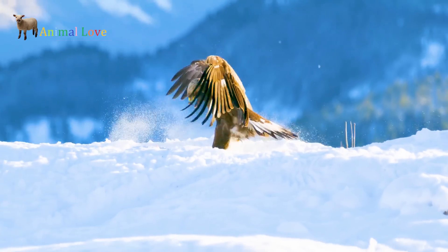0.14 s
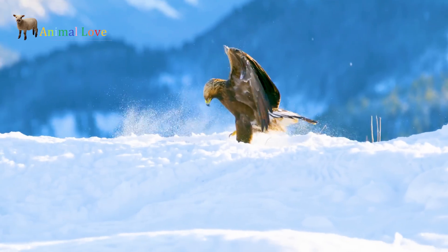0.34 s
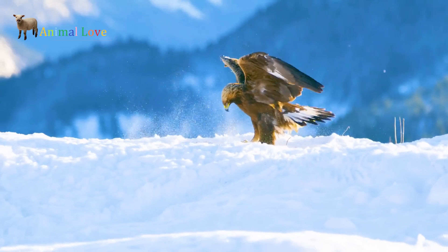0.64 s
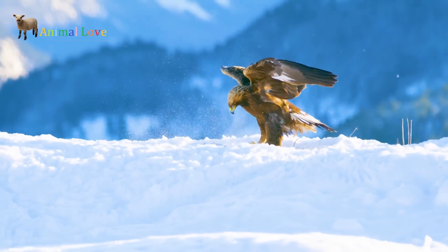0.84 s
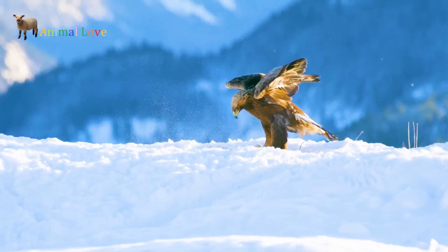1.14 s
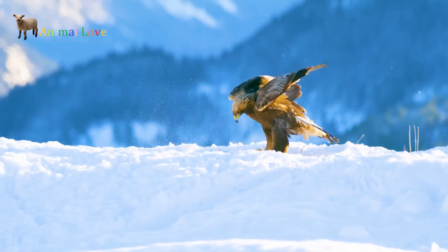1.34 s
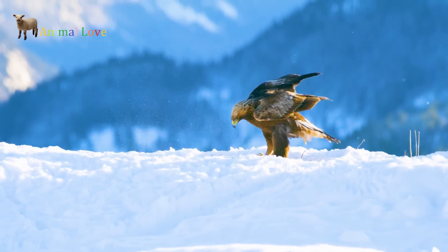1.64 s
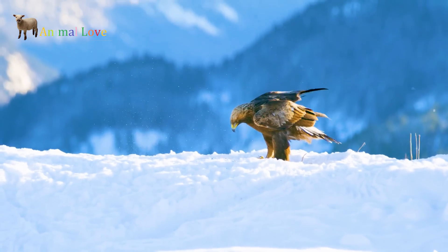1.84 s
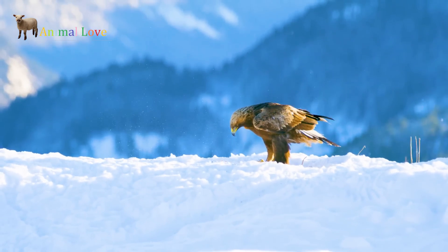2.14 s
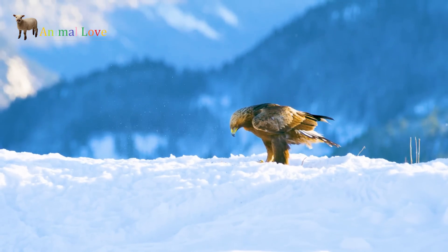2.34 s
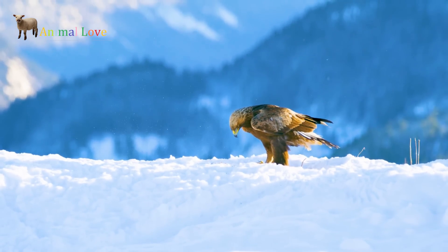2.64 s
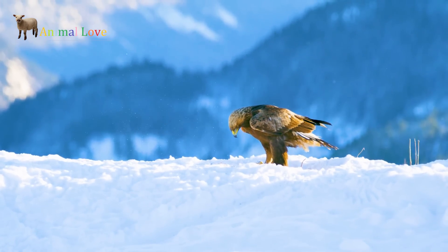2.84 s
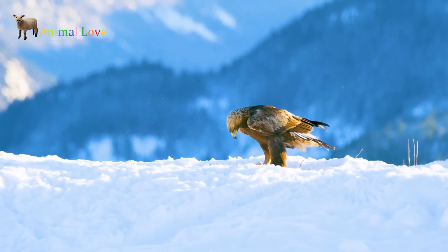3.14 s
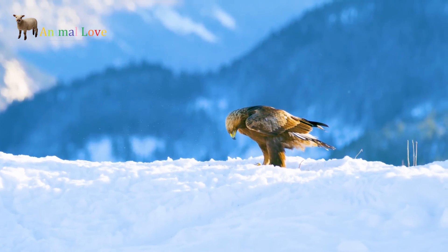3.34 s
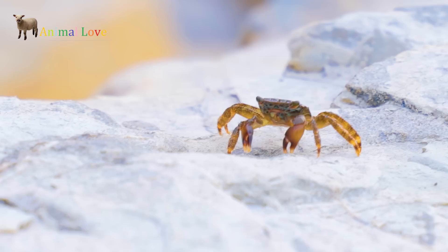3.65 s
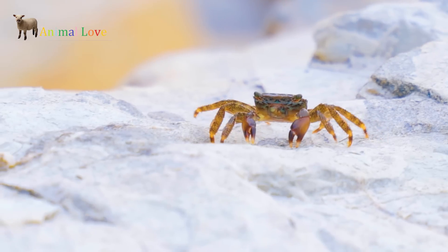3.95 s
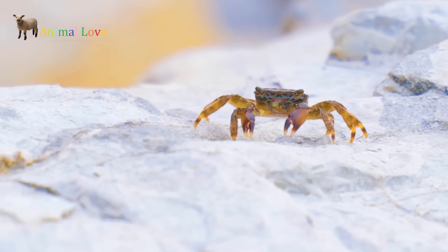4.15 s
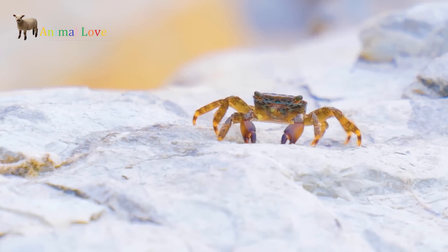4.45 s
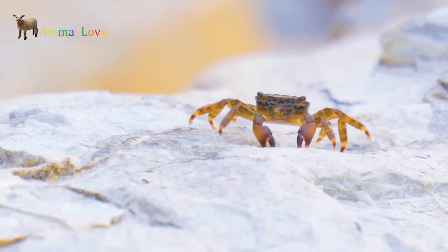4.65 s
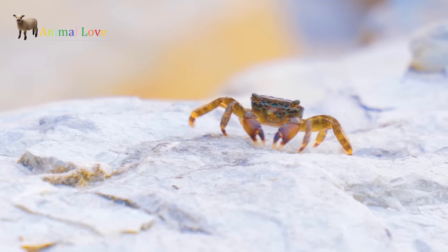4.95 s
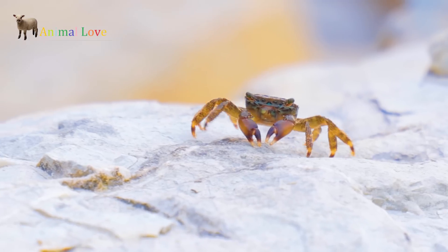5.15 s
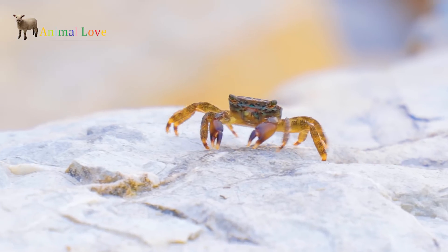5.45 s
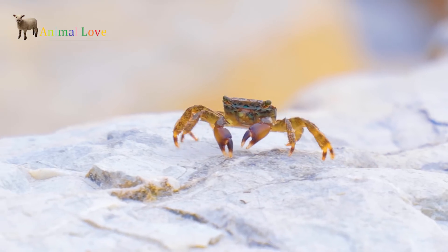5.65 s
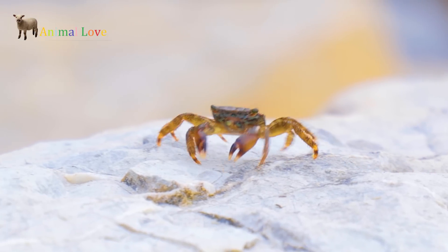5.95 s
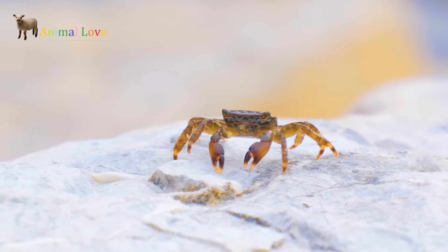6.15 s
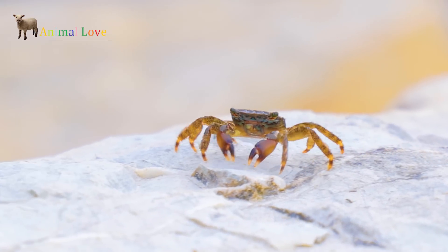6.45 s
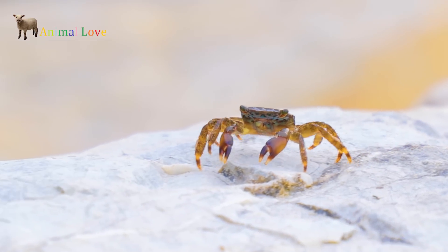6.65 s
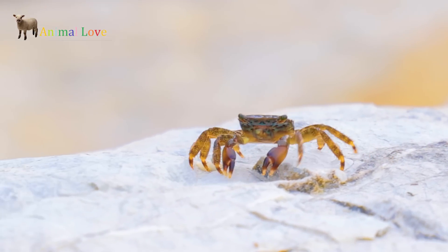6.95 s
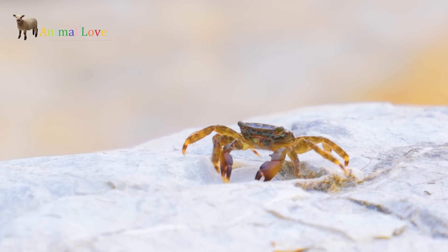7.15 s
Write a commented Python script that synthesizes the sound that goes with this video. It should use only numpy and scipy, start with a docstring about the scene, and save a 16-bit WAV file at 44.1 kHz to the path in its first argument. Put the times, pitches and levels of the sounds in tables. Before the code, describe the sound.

A bird of prey screams loudly and breaks into quavering yelps, songbird chips follow, then woodland air opens with cooing dove and fluting, buzzing thrush.

```python
"""A bird of prey gives one long rasping scream that breaks into a quaver: unsteady tones, sagging and then arching,
over resonant throat noise. Beside it, just right of centre, a small songbird chips, trills and scolds in quick sweeps.
From about 3.2 s a louder woodland air, shaped noise, opens: a dove coos on the left in sagging tones, and a thrush
on the right flutes, buzzes and twitters, with short sharp ticks ringing in strong echo at the centre and faint calls
deeper in the wood. Each bird has its own echo from the trees, scattered differently to the two stereo channels."""
import sys
import numpy as np
from scipy import signal
from scipy.fft import rfft, irfft
from scipy.io import wavfile
from scipy.ndimage import uniform_filter1d, map_coordinates

SR = 44100
rng = np.random.default_rng(int(sys.argv[2]) if len(sys.argv) > 2 else 0)


def digitize_waveform(pressure):
    """Quantize a signal to 16-bit integers and store it at the path in sys.argv[1].

    Rows of a 2-D input are taken as channels; values are limited to [-1, 1].
    """
    field = np.atleast_2d(pressure).T
    bounded = np.clip(field, -1, 1)
    quanta = np.round(bounded * 32767).astype(np.int16)
    wavfile.write(sys.argv[1], SR, quanta)


N = 322371
TIME = np.arange(N) / SR  # seconds
EDGE_S = .0038  # half the time in which a note opens or closes

# The bird of prey's held scream. Each row: time in seconds, pitch in Hz, level in dB.
SCREAM_CURVE = [(0.003, 2151, -12.5), (0.139, 2170, -14.5), (0.307, 2135, -16), (0.333, 2127, -21.5),
                (0.411, 2106, -13.5), (0.449, 2092, -21), (0.477, 2065, -18), (0.493, 2098, -22),
                (0.527, 2059, -17), (0.617, 2061, -17), (0.626, 2038, -20)]
# Its voice breaking downward. Each row: time in seconds, pitch in Hz, level in dB.
BREAK_CURVE = [(.627, 1616, -11), (.651, 1534, -11), (.675, 1727, -10.5), (.69, 1816, -21),
               (.704, 1577, -11), (.725, 1500, -13.5), (.744, 1628, -9.5), (.765, 1489, -13)]
# Scream and lower voice cutting briefly into each other. Each row: start in seconds, length in seconds,
# first, middle and last pitch in Hz, level in dB.
CATCHES = [(0.573, .04, 1631, 1633, 1590, -26), (0.675, .026, 2069, 2090, 2002, -18.5)]
# Arched yelps of the quaver, each led in by a low scoop. Each row: start in seconds, length in seconds,
# top pitch in Hz, level in dB, scoop length in seconds.
YELPS = [(.802, .028, 1632, -8.5, .035), (.861, 0.03, 1670, -7.5, .03), (.924, .028, 1685, -7, .03),
         (.989, 0.026, 1640, -8, .016), (1.057, .028, 1677, -10, .014), (1.134, .021, 1659, -9, .014)]
# Throat resonances of the rasp. Each row: centre in Hz, width in Hz, relative level in dB.
THROAT_RESONANCES = [(860, 370, -11), (1417, 170, -5), (1568, 170, 4.5), (2120, 260.6, -3),
                     (2570, 210, -14), (3650, 150, -21)]
# Strength of the rasp. Each row: time in seconds, level in dB.
RASP_CURVE = [(0, -24.5), (.28, -29.5), (.34, -32), (.4, -30), (.52, -38), (.6, -38), (.72, -38.5),
              (.8, -35.5), (1.08, -35), (1.161, -41.5)]

# Songbird chips: a quick lead-in, most often upward, then a fall, shaken in many of them. Each row: time of the
# turn in seconds, lead-in and fall in seconds, first, turning and last pitch in Hz,
# level at the beak's resonance in dB, shake rate in Hz, shake depth in Hz.
CHIPS = [(.088, 0.0081, 0.028, 8300, 8660, 4840, -25.5, 127, 400),
         (.159, 0.0039, 0.036, 8500, 8580, 4660, -26, 123.5, 350),
         (.449, 0.0063, 0.026, 4700, 7000, 5150, -28, 181, 699),
         (.552, 0.0062, 0.029, 5060, 7300, 5380, -27, 178, 681),
         (2.657, 0.012, 0.059, 4650, 8600, 3700, -29, 0.5, -0.5),
         (2.853, 0.013, 0.056, 3900, 8280, 3600, -25.5, 0, -1),
         (3.046, 0.0069, 0.01, 4880, 6220, 3340, -18.5, -1, -2),
         (3.192, 0.0061, 0.0099, 4840, 6160, 3360, -22, 0.5, 0),
         (3.297, 0.0032, .058, 7200, 6460, 4170, -22.5, 112, 746),
         (3.522, .002, 0.039, 8540, 8400, 4430, -22.5, 123.5, 380),
         (3.596, .002, .039, 8500, 8380, 4530, -26.5, 115, 550),
         (3.675, 0.0035, 0.037, 8550, 8250, 4400, -24.5, 114, 380)]
BEAK_HZ, BEAK_DB_PER_OCT2 = 5450, -44  # resonance of the beak; loss per squared octave away from it
# Songbird whistles. Each row: start in seconds, length in seconds, first, middle and last pitch in Hz,
# level in dB, loudest point as a share of the note, swell in dB, shake depth in Hz.
WHISTLES = [(0.248, 0.075, 3264, 3244, 3070, -31, 0.34, 10, 0),
            (0.401, 0.45, 2730, 2795, 2780, -42, 0.4, 8, 1),
            (.418, 0.029, 4480, 4750, 4740, -30, 1, 8, 1.5),
            (0.517, 0.031, 4700, 5030, 5000, -25, 0.55, 7, 0.5),
            (0.674, 0.072, 3470, 3675, 3670, -30, 0.1, 12.5, -0.5),
            (1.85, 0.03, 4300, 4535, 4510, -33.5, 0.55, 17, 0),
            (2.009, 0.041, 3220, 3515, 3566, -38.5, 0.7, 23, -0.5),
            (2.203, 0.074, 4600, 5840, 6150, -46.5, 0.1, 13.5, 49.5),
            (2.224, 0.077, 3450, 4070, 4120, -51, .3, 5, 0),
            (2.355, 0.11, 6340, 6340, 6250, -53.5, 0.2, 7, 0),
            (2.36, 0.093, 4140, 4360, 4610, -38.5, 1, 26, 1),
            (2.449, 0.1, 4614, 5580, 5930, -35, 0.25, 7.5, -0.5),
            (2.763, 0.034, 3134, 3540, 3570, -33, 0.62, 13, 0),
            (2.952, 0.055, 3530, 3780, 4290, -25.5, .68, 11, 169),
            (3.013, 0.0254, 4400, 4656, 4910, -23, 0.8, 1, 0.5),
            (3.11, 0.042, 3590, 3750, 4190, -26, 0.7, 9.5, 174),
            (3.156, 0.033, 4240, 4600, 4850, -25.5, 0.9, 5, 0),
            (3.258, 0.034, 5600, 6260, 8400, -29, .42, 10, 0.5),
            (3.353, 0.033, 3880, 3690, 3520, -24.5, 0.16, 8, 0),
            (3.397, 0.029, 3790, 4200, 4320, -33, .9, 6, 1),
            (3.429, 0.032, 4390, 4564, 4460, -21, 0.3, 10, 0)]
WHISTLE_SHAKE_HZ = 195.6
# Harsh scolding notes. Each row: start in seconds, length in seconds, pitch in Hz, level in dB,
# flap rate in Hz, flap depth in Hz, hiss in dB.
SCOLDS = [(1.606, .025, 3500, -26.5, 689, 700, -2), (3.469, 0.028, 3540, -28, 519, 700, -11)]
# What the wide-open beak lets through. Each row: frequency in Hz, gain in dB.
OPEN_BEAK = [(1500, -45), (2500, -29), (3050, 0), (4400, 0), (5600, -8), (6600, -21), (8000, -18),
             (9400, -38), (11000, -31), (15000, -39)]
BOUNCE_S, BOUNCE_DB = .0027, -10  # the songbird's reflection from the ground

# Thrush notes. Each row: start in seconds, length in seconds, first, middle and last pitch in Hz, level in dB,
# loudest point as a share of the note, swell in dB, shake depth in Hz, roughness as a share of the pitch.
SONG = [(4.348, 0.12, 2113, 2170, 1900, -24, 0.48, 7, -2, 0.01),
        (4.55, 0.11, 1581, 1669, 1860, -21.5, 0.86, 9.5, 0, 0.01),
        (4.661, .11, 1843, 1830, 1730, -19, 0.95, 11.5, 0, 0),
        (4.852, 0.042, 2140, 2134, 1824, -19, 0.92, 7, -2, 0.01),
        (4.889, 0.035, 2690, 2440, 2470, -30.5, 0.34, 11, -0.5, 0.03),
        (4.938, 0.078, 1997, 2107, 2240, -12, 0.3, 4, 0, .003),
        (5.118, .058, 2150, 2450, 2870, -13, 1, 18.5, 0, 0.05),
        (5.178, 0.0062, 2910, 2940, 2970, -7, .6, 2, 2, 0),
        (5.187, .014, 2940, 2900, 2720, -14, 0.62, 6, 0, 0.03),
        (5.306, 0.017, 4220, 4130, 4200, -24.5, .5, 1, -2, .03),
        (5.15, 0.042, 3400, 3670, 3840, -31.5, 0, 6, 0, 0.03),
        (5.716, 0.037, 4520, 4360, 4470, -18.5, .55, 5, 0.5, 0.03),
        (5.782, 0.077, 2018, 2094, 1990, -25.5, 0.47, 12.5, 0.5, 0.02),
        (5.81, 0.024, 3770, 3940, 4400, -20, 0.1, 5, 0, 0.04),
        (5.864, .042, 11300, 10850, 10700, -35, 0.5, 3, 451, 0.06),
        (5.883, 0.051, 3580, 3643, 3510, -11.5, 0.45, 13.5, 2, 0.01),
        (5.982, 0.16, 3356, 2967, 2938, -22.5, 0.8, 5, 0.5, 0.02),
        (6.003, 0.13, 3620, 4274, 3125, -11.5, 0.48, 14, 166, 0.01),
        (6.005, 0.12, 2150, 2070, 2020, -36.5, .5, 4, -2, 0.02),
        (6.178, 0.044, 3494, 4360, 5320, -10, 0.81, 13, 0.5, 0.04),
        (6.221, 0.033, 5380, 5470, 5300, -15, 0, 10, 0, 0.03),
        (6.315, .011, 4260, 4500, 4480, -14, .35, 6, -1, 0.02),
        (6.33, .048, 4750, 5236, 3960, -15, 0.35, 3, 250, 0.02),
        (6.378, 0.018, 4080, 3860, 3770, -22, .2, 2, 0, .02),
        (6.503, .026, 2850, 2890, 2890, -24, 0.66, 15, 2, 0.01),
        (6.555, .07, 3190, 3170, 3150, -34, 0, 10, 0, 0.03),
        (6.532, 0.024, 2220, 2325, 2290, -31, .25, 6, -2, .016),
        (6.543, 0.048, 2950, 2966, 2880, -20, 0.12, 19, 0, .016),
        (6.605, 0.038, 1980, 1930, 2070, -30, 1, 10, -5, 0.01),
        (6.639, 0.036, 2206, 2324, 2220, -21, 0.25, 7, 7, 0.01),
        (6.645, 0.034, 3130, 3170, 3150, -29.5, 0.7, 2, -0.5, 0.02),
        (6.968, 0.017, 2870, 2780, 2730, -27.5, 0.2, 4, -0.5, .016),
        (6.985, .034, 2870, 2950, 2910, -17.5, .55, 7, -4, 0),
        (7.024, 0.032, 2892, 2904, 2790, -18, 0.2, 12, 0, 0),
        (7.074, 0.067, 1790, 1795, 1620, -29, 0.57, 17, 2, 0)]
SONG_SHAKE_HZ = 87.5
# The thrush's buzz. Each row: time in seconds, lowest and highest pitch of a sweep in Hz, level in dB.
BUZZ_CURVE = [(5.309, 3100, 3500, -30), (5.345, 2480, 3580, -24.5), (5.39, 2400, 3600, -25),
              (5.435, 2280, 3250, -24.5), (5.485, 2260, 3400, -26.5), (5.52, 2260, 3512, -28.5),
              (5.61, 2248, 3500, -28.5), (5.655, 2250, 3300, -38)]
BUZZ_FIRST_S, BUZZ_RATE_HZ, BUZZ_SLOWING_HZ_PER_S = 5.32, 42.4, 23
# Windpipe and beak that shape the buzz. Each row: frequency in Hz, gain in dB.
BUZZ_PASSAGE = [(1700, -28), (2150, -16), (2350, -10), (2680, -11), (2930, 0), (3250, -1), (3550, -4.5),
                (3750, -26), (4000, -13), (4500, -2.5), (5100, -1.5), (5700, -3.5), (7000, -3.5),
                (7700, -11), (9000, -14), (10300, -3.5), (11600, -6.5), (13000, -20), (15000, -25)]
# Narrow resonances that ring on between the sweeps. Each row: frequency in Hz, gain in dB.
BUZZ_RINGS = [(2330, -4), (2950, 2), (4520, 5)]
BUZZ_RING_WIDTH_HZ = 85
# One thin wheeze rich in overtones. The row: start in seconds, length in seconds, first, middle and last
# pitch in Hz, level in dB, loudest point as a share of the note (limited to near its end), swell in dB.
WHEEZE = (7, 0.11, 2039, 2126.5, 2019, -40.5, 3, 3.5)
# Short sharp ticks. Each row: time in seconds, peak in dB.
TICKS = [(5.6929, -21), (5.7095, -21), (5.749, -24), (5.7636, -20), (5.7793, -18.5), (5.789, -21),
         (5.8237, -23), (5.8334, -16), (5.849, -17.5), (5.8548, -22)]

# The dove's phrase. Each row: seconds from the phrase start, length in seconds, top and end pitch in Hz,
# lateness of the sag as a power, level in dB, loudest point as a share of the note, swell in dB.
COOS = [(0, .255, 600.3, 520, 10.4, -43.5, 1, 1), (0.346, .425, 587.5, 463.5, 2.6, -35.5, 0.36, 4.5),
        (1.037, .155, 572, 452, .6, -39.5, .55, 5.5)]
# Starts of the dove's phrases, in seconds.
PHRASE_STARTS_S = [3.205, 4.912, 6.618]
COO_FROM_HZ, COO_BREAK_S, COO_JUMP_S = 464, 0.0371, 0.0068  # low start, time until the jump, its quickness

# Other birds, deeper in the wood. Each row: start in seconds, length in seconds, first, middle and last
# pitch in Hz, level in dB, roughness as a share of the pitch.
FAR_CALLS = [(3.681, 0.022, 4510, 4400, 4400, -34, 0.03), (3.742, .04, 3600, 3520, 3500, -46.5, 0.02),
             (4.742, 0.028, 4830, 4370, 4120, -48, 0.03), (4.922, 0.035, 4690, 4700, 4660, -41.5, 0.02),
             (5.022, 0.024, 5720, 4870, 4200, -37, 0.1), (5.059, .025, 3586, 3530, 3530, -40.5, 0.02),
             (5.098, 0.031, 5900, 5000, 4100, -37.5, 0.06), (6.418, 0.13, 4990, 4890, 5000, -36.5, 0.11),
             (6.682, 0.055, 5220, 5470, 5460, -39.5, 0.03)]
# Spectrum of the still air. Each row: frequency in Hz, relative level in dB.
STILL_SPECTRUM = [(30, -10), (50, -3), (98, -8), (439, -5.5), (1140, -8.5), (1790, -14.5), (3670, -13.5),
                  (6200, -15.5), (10000, -34), (15000, -28.5)]
# Spectrum of the woodland air. Each row: frequency in Hz, relative level in dB.
WOOD_SPECTRUM = [(25, 1), (104, 0.5), (164, -8.5), (227, -6.5), (340, -9), (703, -16.5), (945, -8.5),
                 (1170, -20), (1620, -15.5), (2560, -25.5), (4260, -24.5), (5280, -12), (6380, -18.5),
                 (15500, -28)]
STILL_DB, WOOD_DB, WOOD_START_S = -62, -42.5, 3.195


def raptor():
    """A membrane tone screams over throat rasp, then drops low and scoops up into each yelp of the quaver."""
    catches = [slur(*row, peak=.5, swell_db=5) for row in CATCHES]
    scream = sing([gesture(SCREAM_CURVE), *catches], [-23.0, -60, -48, -47.5],
                  jitter=0.0051, jitter_hz=402, shimmer_db=0.1)
    scream = undb(-0.17) * scream
    quaver = yelps() + scoops() + rasp()
    return (place(scream, 0.286)
            + trees(scream, t60_s=.45, wet_db=-4.5, delay_s=0.0097, centre_db=-5.0)
            + place(quaver, 0.45)
            + trees(quaver, t60_s=0.55, wet_db=-4, delay_s=0.005, centre_db=-0.5))


def yelps(rise_hz=105, drop_hz=140):
    """The unsteady membrane breaks to a lower pitch, then arches up and down in each yelp."""
    arches = [slur(s, length, hz - rise_hz, hz, hz - drop_hz, db, peak=0.39, swell_db=4.5)
              for s, length, hz, db, _ in YELPS]
    return sing([gesture(BREAK_CURVE), *arches], [-22, -41, -58.0, -44, -53, -55],
                jitter=.016, jitter_hz=1399, shimmer_db=0.83)


def scoops(low_hz=860, knee_hz=930, top_hz=1200, level_db=-21.0):
    """Low tones with strong overtones glide up to the start of each yelp, loudest at the knee."""
    glides = []
    for s, *_, lead in YELPS:
        glides.append(gesture([(s - lead, low_hz, -13), (s - lead / 3, knee_hz, 0), (s, top_hz, -9)]))
    return undb(level_db) * sing(glides, [-2, -20], jitter=0.03, jitter_hz=890, shimmer_db=0.5)


def rasp(flutter_db=2.5):
    """Turbulent breath excites the throat resonances, each fluttering in strength on its own."""
    breath = rng.standard_normal(N)
    throat = np.zeros(N)
    for hz, width_hz, db in THROAT_RESONANCES:
        # two wider passes in a row come close to the width in the table, with steeper skirts
        resonance = band(band(breath, hz, 1.5 * width_hz), hz, 1.5 * width_hz)
        throat += undb(db + flutter_db * wander(N, 45)) * resonance
    low_cut = signal.butter(4, 620, "high", fs=SR, output="sos")
    throat = signal.sosfilt(low_cut, unit(throat))
    s, db = np.transpose(RASP_CURVE)
    return throat * undb(np.interp(TIME, s, db)) * (TIME < s[-1])


def songbird():
    """Fast chips, whistles and scolds, each followed at once by a weaker reflection from the ground."""
    notes = [shake(chip(*row), rate, depth, throb_db=1.0) for *row, rate, depth in CHIPS]
    notes += [shake(slur(*row), WHISTLE_SHAKE_HZ, depth, throb_db=1.5) for *row, depth in WHISTLES]
    voice = sing(notes, [-39], jitter=.007, jitter_hz=940, shimmer_db=2) + scolds()
    bounce = undb(BOUNCE_DB) * np.interp(TIME - BOUNCE_S, TIME, voice)
    voice = voice + bounce
    return place(voice, -0.8) + trees(voice, t60_s=0.19, wet_db=-7.5, delay_s=0.0019)


def chip(turn_s, lead_s, fall_s, from_hz, turn_hz, to_hz, db, bend=0.93, lead_db=-11, fade_db=-6):
    """A quick lead-in, most often upward, then a fall; louder the nearer the pitch is to the beak's resonance."""
    t, gate = span(turn_s - lead_s, turn_s + fall_s)
    before = np.clip((turn_s - t) / lead_s, 0, 1)
    after = np.clip((t - turn_s) / fall_s, 0, 1)
    hz = turn_hz * (from_hz / turn_hz) ** (before ** 2) * (to_hz / turn_hz) ** (after ** bend)
    beak_db = BEAK_DB_PER_OCT2 * np.log2(hz / BEAK_HZ) ** 2
    return t, hz, gate * undb(db + beak_db + lead_db * before + fade_db * after ** 4)


def scolds(unsteady=0.202, grain_db=3):
    """The membrane flaps irregularly: every flap jerks the pitch and lets out a puff of hiss."""
    out = np.zeros(N)
    for start, length, hz, db, flap_hz, depth_hz, hiss_db in SCOLDS:
        t, gate = span(start, start + length)
        flap_rate = flap_hz * (1 + unsteady * wander(len(t), 498))
        flap = np.sin(2 * np.pi * np.cumsum(flap_rate) / SR)
        tone = syrinx(hz + depth_hz * flap + 200 * wander(len(t), 1205), [-4, -6])
        hiss = unit(colour(rng.standard_normal(len(t)), OPEN_BEAK))
        voice = (colour(tone, OPEN_BEAK) + undb(hiss_db) * hiss) * undb(grain_db * flap)
        add(out, t, gate * undb(db) * unit(voice))
    return out


def thrush():
    """Bending tones make fluted notes and a twitter of overlapping voices, with a buzz and a wheeze."""
    song = buzz()
    for *row, depth, rough in SONG:
        note = shake(slur(*row), SONG_SHAKE_HZ, depth, throb_db=4.5)
        song += sing([note], [-45.0, -45, -59, -41], jitter=rough, jitter_hz=600, shimmer_db=1)
    # the wheeze: its second harmonic is stronger than its fundamental
    song += sing([slur(*WHEEZE)], [8, -7.5, -15, -10, -12], jitter=0.0124, jitter_hz=490, shimmer_db=3.5)
    # always right of centre, drifting inward and out again
    pan_db = np.interp(TIME, [4.4, 5.5, 6.1, 6.35, 6.6], [-5.5, -4.0, -2.5, -2.0, -5.0])
    return place(song, pan_db) + trees(song, t60_s=.65, wet_db=-12.5, delay_s=.013)


def buzz(hiss_db=-7, rough=0.0282, grain_db=1.5):
    """A slowing train of hoarse sweeps: each rests on a low squeak, climbs steeply and breaks off."""
    t, top_hz, gain = gesture([(s, top, db) for s, _, top, db in BUZZ_CURVE])
    low_hz = np.interp(t, *np.transpose(BUZZ_CURVE)[:2])
    since = t - BUZZ_FIRST_S
    cycle = (BUZZ_RATE_HZ * since - BUZZ_SLOWING_HZ_PER_S * since ** 2 / 2) % 1
    climb = np.interp(cycle, [0, .3, .85, 1], [0, 0, 1, 1])
    breath = np.interp(cycle, [0, .08, .88, 1], [0, 1, 1, 0])
    hz = (low_hz + (top_hz - low_hz) * climb) * (1 + rough * wander(len(t), 1500))
    tone = syrinx(hz, [-1, -4.5, -11, -11]) * breath
    hiss = undb(hiss_db) * 2 * rng.standard_normal(len(t))
    voice = (tone + hiss) * undb(grain_db * wander(len(t), 450))
    rings = sum(undb(db) * band(voice, ring_hz, BUZZ_RING_WIDTH_HZ) for ring_hz, db in BUZZ_RINGS)
    out = np.zeros(N)
    add(out, t, gain * unit(colour(voice + rings, BUZZ_PASSAGE)))
    return out


def ticks(from_hz=6600, to_hz=4000, length_s=0.00384, weak_db=-6, weak_count=26):
    """A sharp, echoing rattle: each tick is a very quick downward sweep, with weaker ones scattered between."""
    out = np.zeros(N)
    t = np.arange(0, length_s, 1 / SR)
    sweep = np.hanning(len(t)) * signal.chirp(t, from_hz, length_s, to_hz)
    times, levels = np.transpose(TICKS)
    weak = [(s, levels.mean() + weak_db) for s in rng.uniform(times[0], 5.9, weak_count)]
    for s, db in [*TICKS, *weak]:
        add(out, s + t, undb(db) * sweep)
    return place(out, 0) + trees(out, t60_s=0.48, wet_db=3.0, delay_s=0.0023)


def dove():
    """Soft, nearly pure coos in threes, the same phrase each time; the low notes lie furthest left."""
    notes = [coo(start + s, *row) for start in PHRASE_STARTS_S for s, *row in COOS]
    coos = sing(notes, [-32], jitter=0.0089, jitter_hz=118.8, shimmer_db=1.5)
    left = undb(3.5) * coos
    right = colour(coos, [(500, -8.5), (590, -3.0)])
    return np.array([left, right]) + trees(coos, t60_s=0.45, wet_db=-12.5, delay_s=0.006)


def coo(start, length, top_hz, end_hz, lateness, db, peak, swell_db):
    """The voice starts low, jumps up, holds and sags as the air runs out."""
    t, _, gain = swell(start, length, db, peak, swell_db)
    since = t - start - COO_BREAK_S
    sag = np.clip(since / (length - COO_BREAK_S), 0, 1) ** lateness
    sagging_hz = top_hz - (top_hz - end_hz) * sag
    jump = (1 + np.tanh(since / COO_JUMP_S)) / 2
    return t, COO_FROM_HZ + (sagging_hz - COO_FROM_HZ) * jump, gain


def far_birds():
    """Faint short chirps, rough, blurred bending tones from deeper in the wood, half lost in their echo."""
    calls = np.zeros(N)
    for *row, rough in FAR_CALLS:
        note = slur(*row, peak=0.62, swell_db=-4)  # the negative swell lifts both ends
        calls += sing([note], [], jitter=rough, jitter_hz=880, shimmer_db=3)
    return calls + trees(calls, t60_s=.35, wet_db=-4, delay_s=.006)


def air(spectrum, level_db, low_side_db, high_side_db, flicker_db):
    """Outdoor air as wavering shaped noise: the rumble sits nearer the centre, the hiss spreads wider."""
    mid, side = (colour(rng.standard_normal(N), spectrum) * undb(flicker_db * wander(N, 7.9))
                 for _ in range(2))
    side = colour(side, [(2000, low_side_db), (8000, high_side_db)])
    return undb(level_db) * np.array([mid + side, mid - side]) / np.std(mid)


def trees(x, t60_s, wet_db, delay_s, centre_db=0):
    """Scattered echoes that set in after a delay, different at each ear; a weak centre makes them wider."""
    t = np.arange(SR) / SR
    centre, side = rng.standard_normal((2, SR))
    centre = centre * undb(centre_db)
    onset = np.clip(t / delay_s - 1, 0, 1)
    tail = np.array([centre + side, centre - side]) * undb(-60 * t / t60_s) * onset
    tail /= np.sqrt(np.sum(tail ** 2, axis=1, keepdims=True))
    return undb(wet_db) * signal.fftconvolve(x[None], tail, axes=1)[:, :N]


def place(x, pan_db):
    """Set a sound left (+) or right (-) by the level difference between the channels."""
    return x * undb(np.vstack([pan_db, -pan_db]) / 2)


def sing(notes, overtones_db, jitter, jitter_hz, shimmer_db):
    """Play notes with an unsteady pitch and loudness."""
    out = np.zeros(N)
    for t, hz, gain in notes:
        hz = hz * (1 + jitter * wander(len(t), jitter_hz))
        shimmer = undb(shimmer_db * wander(len(t), 90))
        add(out, t, gain * shimmer * syrinx(hz, overtones_db))
    return out


def syrinx(hz, overtones_db):
    """A vibrating membrane: a fundamental of rms 1 and overtones at levels relative to it."""
    phase = 2 * np.pi * np.cumsum(hz) / SR
    harmonics = enumerate([0, *overtones_db], 1)
    return np.sqrt(2) * sum(undb(db) * np.sin(k * phase) * (k * hz < SR / 2) for k, db in harmonics)


def gesture(curve):
    """A note (times, pitch, loudness) that follows a curve."""
    s, hz, db = np.transpose(curve)
    t, gate = span(s.min(), s.max())
    return t, uniform_filter1d(np.interp(t, s, hz), size=130), gate * undb(np.interp(t, s, db))


def slur(start, length, from_hz, middle_hz, to_hz, db, peak, swell_db):
    """A swelling note whose pitch bends in one arc."""
    t, progress, gain = swell(start, length, db, peak, swell_db)
    arc = np.polyfit([0, .5, 1], [from_hz, middle_hz, to_hz], 2)
    return t, np.polyval(arc, progress), gain


def shake(note, rate_hz, depth_hz, throb_db):
    """A fast trill, deepest in mid-note; the airflow throbs with every shake."""
    t, hz, gain = note
    wave = np.sin(2 * np.pi * rate_hz * (t - t[0])) * signal.windows.tukey(len(t), .5)
    throb_share = min(abs(depth_hz) / 150, 1)  # shallow shakes throb less
    return t, hz + depth_hz * wave, gain * undb(throb_db * throb_share * wave)


def swell(start, length, db, peak, swell_db):
    """Times, progress 0-1 and loudness of a note, swell_db down at its ends from the level at its peak."""
    t, gate = span(start, start + length)
    progress = np.clip((t - start) / length, 0, 1)
    peak = np.clip(peak, .02, .98)
    away = np.where(progress < peak, (peak - progress) / peak, (progress - peak) / (1 - peak))
    return t, progress, gate * undb(db - swell_db * away ** 2)


def span(start, end):
    """Times of one note and its soft-ended gate."""
    t = np.arange(start - EDGE_S, end + EDGE_S, 1 / SR)
    to_edge = np.minimum(t - t[0], t[-1] - t)
    return t, np.sin(np.pi / 2 * np.clip(to_edge / (2 * EDGE_S), 0, 1)) ** 2


def add(track, t, x):
    """Mix x into the track from time t[0] on."""
    i = max(int(t[0] * SR), 0)
    track[i:i + len(x)] += x[:max(N - i, 0)]


def colour(x, points):
    """Filter by a curve of (Hz, dB) points."""
    hz, db = np.transpose(points)
    log_hz = np.log(np.arange(len(x) // 2 + 1) * SR / len(x) + 1)
    return irfft(rfft(x) * undb(np.interp(log_hz, np.log(hz), db)), len(x))


def band(x, hz, width_hz):
    """A resonance, gain 1 at its centre."""
    return signal.lfilter(*signal.iirpeak(min(hz, SR * .45), hz / width_hz, SR), x)


def wander(size, rate_hz):
    """Smooth chance with a spread near 1: random values at rate_hz, joined by straight lines."""
    steps = np.arange(size) * rate_hz / SR
    return map_coordinates(rng.standard_normal(size), [steps], order=1, mode="nearest") * np.sqrt(3 / 2)


def unit(x):
    """Scale to rms 1."""
    return x / np.sqrt(np.mean(x ** 2))


def undb(db):
    """Decibels to gain."""
    return 10 ** (np.asarray(db) / 20)


def scene():
    """The birds over the still air, and over the woodland air once it opens."""
    still = air(STILL_SPECTRUM, STILL_DB, low_side_db=-4, high_side_db=-2.5, flicker_db=-0.5)
    wood = air(WOOD_SPECTRUM, WOOD_DB, low_side_db=-13.5, high_side_db=-1.5, flicker_db=1.46)
    opening = np.clip((TIME - WOOD_START_S) / 0.0045, 0, 1)
    birds = raptor() + songbird() + thrush() + ticks() + dove() + far_birds()
    return birds + still + opening * wood


def record(dry):
    """A steep cut of the top, above 15850 Hz."""
    return signal.sosfilt(signal.ellip(10, .1, 80, 15850, fs=SR, output="sos"), dry)


dry = scene()
out = record(dry)
digitize_waveform(out)
```